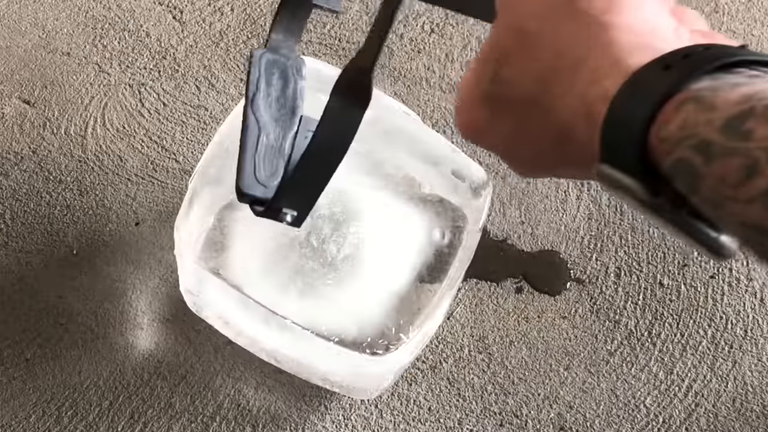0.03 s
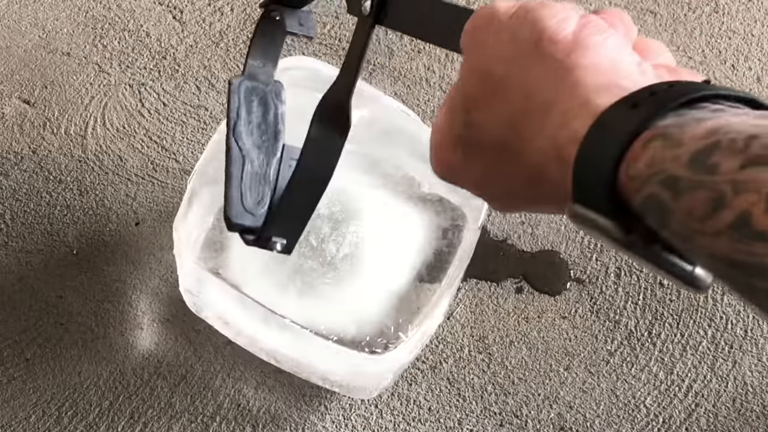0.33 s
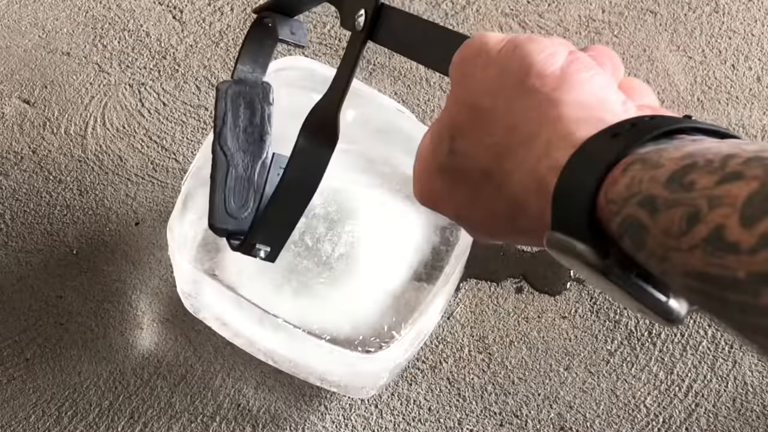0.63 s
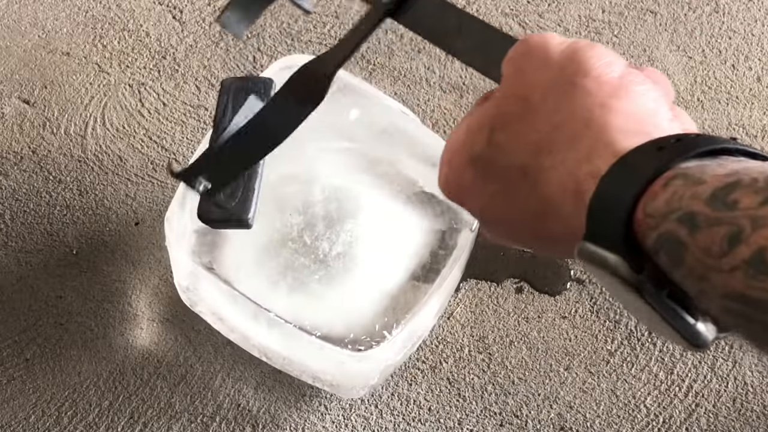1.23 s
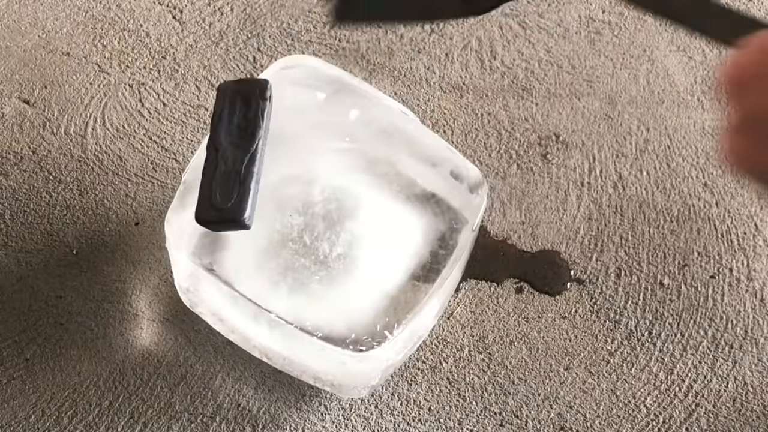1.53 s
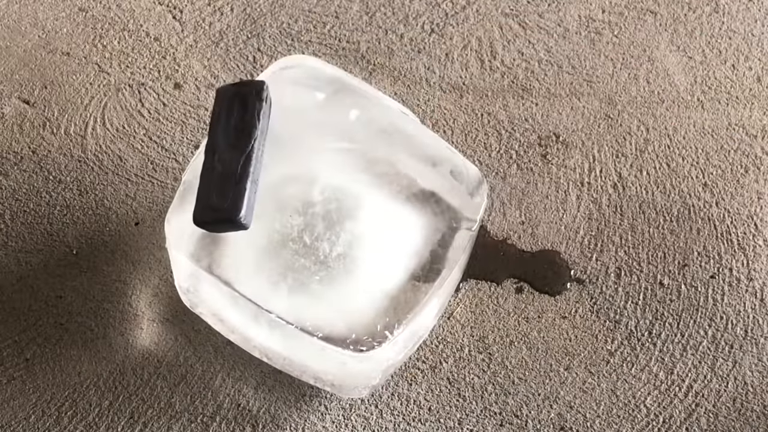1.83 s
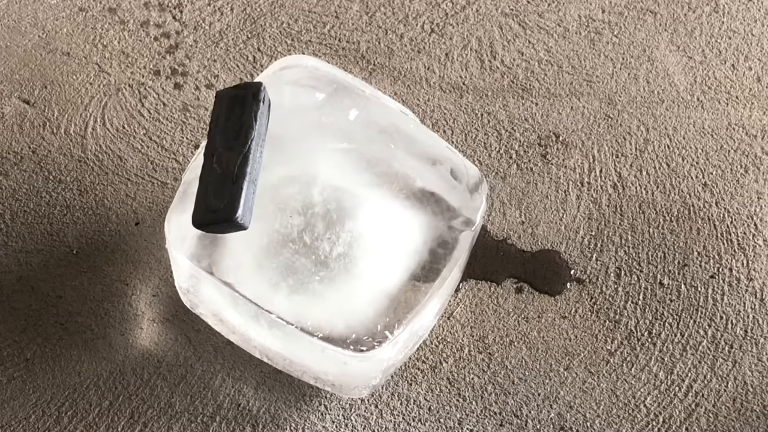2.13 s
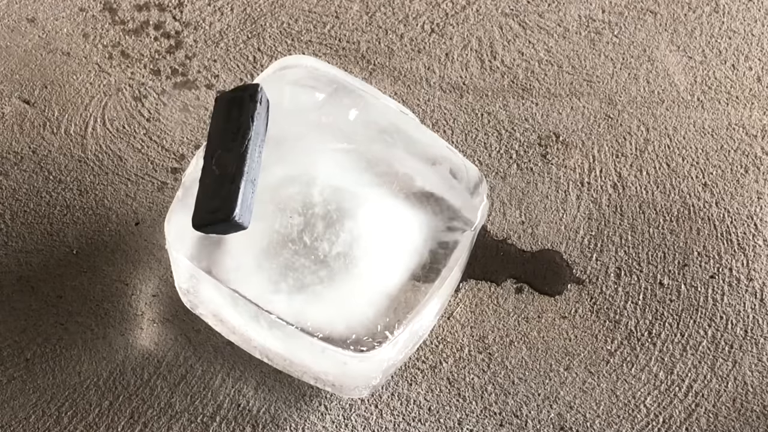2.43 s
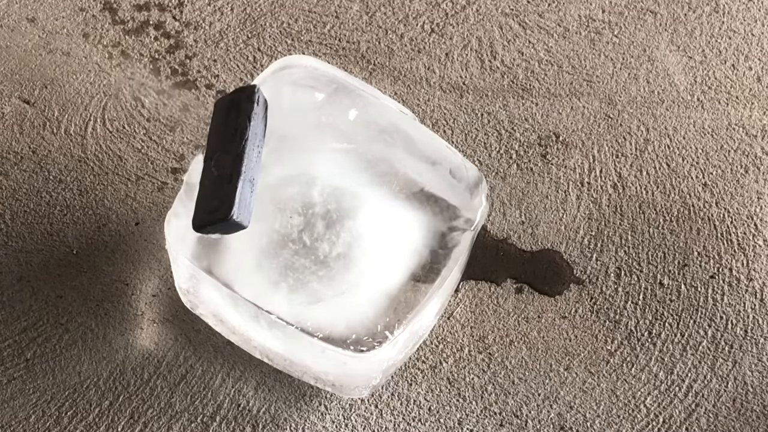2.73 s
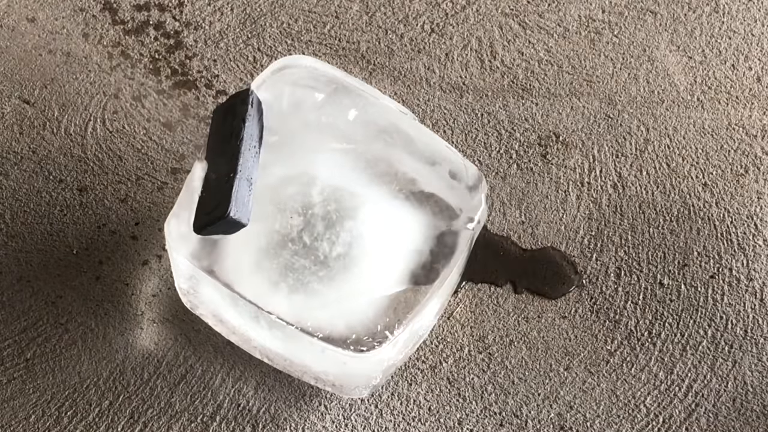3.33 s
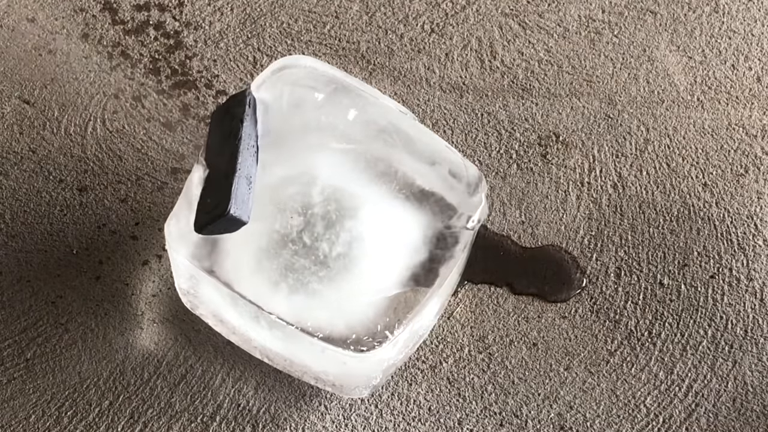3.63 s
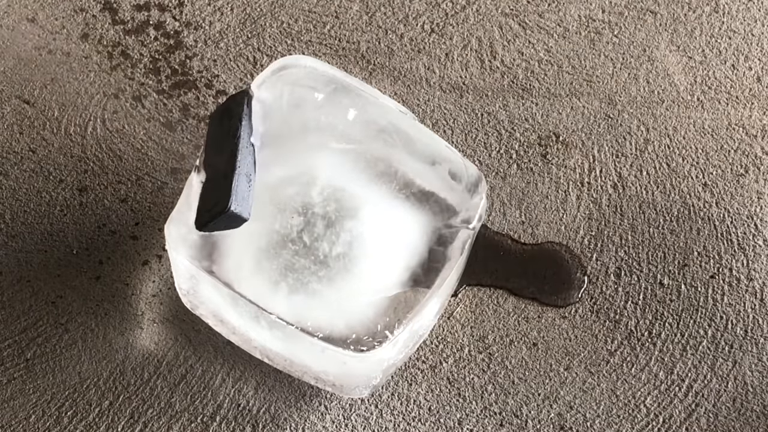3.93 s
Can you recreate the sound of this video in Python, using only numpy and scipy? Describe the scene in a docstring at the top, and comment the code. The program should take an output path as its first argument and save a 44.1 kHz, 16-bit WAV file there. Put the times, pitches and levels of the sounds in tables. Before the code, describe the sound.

Hot metal sizzles on ice, squealing and gurgling, then spitting ever harder.

```python
"""On a concrete floor outdoors, a hot metal bar is laid on a block of ice. It chatters on its own
cushion of steam with a wavering squeal, which breaks into falling chirps and sinks into a boiling
gurgle as meltwater gathers. Steel tongs snap shut with one bright clink. The sizzle grows and spits
ever harder as water flashes to steam. Nearby walls add a short echo over a faint, low rumble."""
import sys
import numpy as np
from scipy import signal
from scipy.fft import rfft, irfft, next_fast_len
from scipy.io import wavfile
from scipy.ndimage import map_coordinates

SR = 44100
rng = np.random.default_rng(int(sys.argv[2]) if len(sys.argv) > 2 else 0)


def generate_wav(signal):
    """Clip the signal to [-1, 1] and save it as 16-bit WAV at the path in sys.argv[1]."""
    frames = np.transpose(np.atleast_2d(signal))
    scaled = np.clip(frames, -1, 1) * 32767
    pcm = np.round(scaled).astype(np.int16)
    wavfile.write(sys.argv[1], SR, pcm)


N = 176400  # 4 seconds


# the bar's squeal, the hum of a steam pocket and a burble (t/s, f/Hz, level/dB)
SQUEAL = [(.865, 930, -49), (.895, 1015, -30), (.94, 990, -40.5), (.996, 1120, -42), (1.04, 994, -37.5),
          (1.09, 1003, -33), (1.18, 796, -37), (1.25, 996, -37.5), (1.37, 997, -40.5), (1.47, 1023, -41),
          (2.83, 1080, -41.5), (3.5, 963, -55)]
POCKET_HUM = [(1.7, 290, -66), (2.05, 255.4, -46.5), (2.25, 220, -46), (2.6, 213, -44.5),
              (2.9, 212.1, -43.5), (3.04, 247.8, -62), (3.18, 274.8, -41.5), (3.68, 280.2, -39),
              (3.85, 348.5, -51)]
BURBLE = [(1.65, 629.5, -37), (3, 533.8, -39), (4, 557, -48)]

def singing():
    """The bar squeals on its steam cushion; lower down, trapped steam hums and burbles."""
    return (wavering(SQUEAL, jitter=0.03206, shimmer_db=3.5, rate=200, octave_db=-18)
            + wavering(POCKET_HUM, jitter=0.02484, shimmer_db=4.5, rate=60, octave_db=-10.5)
            + wavering(BURBLE, jitter=0.0426, shimmer_db=5.5, rate=80, octave_db=-14))


# each chirp at its loudest moment (t/s, f/Hz, level/dB)
CHIRPS = [(1.305, 639, -28.5), (1.399, 640, -27), (1.466, 636, -28), (1.54, 625, -26.5), (1.58, 633, -28),
          (1.715, 633.5, -29), (1.764, 623, -28.5), (1.986, 605.6, -27.5), (2.083, 602, -28),
          (2.25, 591, -28), (2.285, 613, -29), (2.366, 576.5, -27.5), (2.487, 582.6, -30),
          (2.628, 565.4, -30.5)]
# the tones that make up the first chirp (multiple of the pitch, level/dB)
OVERTONES = [(1, -3), (2, -4.5), (3, -16)]

def chirps():
    """Steam lifts the bar with a falling tone and a puff; as it gets wetter, chirps turn into gulps."""
    swoop_hz, swoop_s, dulling_db_per_s, wetting_s = 55, 0.0192, 2.5, 0.7
    tones, puffs = np.zeros(N), np.zeros(N)
    t = np.arange(-SR // 16, SR // 16) / SR  # zero at the chirp's peak
    jitter = 1 + 0.019 * wobble(250)
    swoop = swoop_hz * (np.exp(np.minimum(-t / swoop_s, 1)) - 1)
    first_s = CHIRPS[0][0]
    for s, hz, db in CHIRPS:
        age, start = s - first_s, round(s * SR) - SR // 16
        span = slice(start, start + len(t))
        length = 0.011 + 0.012 * np.exp(-age / 0.26)  # later chirps are shorter
        swell = amp(db) * np.exp(-2 * np.log(2) * (t / length) ** 2)
        phase = phase_of((hz + swoop) * jitter[span])
        for multiple, level in OVERTONES:
            fade_db = dulling_db_per_s * age * (multiple - 1)
            tone = np.sqrt(2) * np.sin(multiple * phase + 2 * np.pi * rng.random())
            tones[span] += swell * amp(level - fade_db) * tone
        puffs[span] += swell
    wetness = np.clip((clock() - first_s) / wetting_s, 0, 1)
    gulp = wetness * amp(-5.5) * noise(BOIL_COLOUR)
    return tones + puffs * (amp(-9.5) * steam() + gulp)


# squeaks of the first touches, then of the squeal breaking up (t/s, level/dB)
SQUEAKS = [(.455, -55.5), (0.599, -57), (1.419, -33), (1.521, -29.5), (1.553, -34), (1.593, -29),
           (1.635, -28), (1.659, -27.5), (1.731, -34.5), (1.798, -31), (1.838, -28), (1.857, -29.5),
           (1.984, -35), (2.128, -34.5)]

def squeaks():
    """Each short touch of the bar gives a rough, falling squeak."""
    length_s, fall_hz_per_s = 0.015, 7300
    out, hz = np.zeros(N), 1022 * (1 + 0.028 * wobble(250))
    for s, db in SQUEAKS:
        t = clock() - s
        swell = amp(db) * np.exp(-2 * (t / length_s) ** 2)
        out += swell * np.sqrt(2) * np.sin(phase_of(hz - fall_hz_per_s * t))
    return out


# how loud the boiling is (t/s, level/dB)
BOIL_LEVEL = [(.85, -68), (.9, -47), (1.25, -43.5), (1.55, -38.5), (1.8, -34), (2.8, -34.5), (3.55, -35),
              (3.8, -32)]
# its colour, meaning how strong the low and high parts are (f/Hz, level/dB)
BOIL_COLOUR = [(100, -52), (220, -6), (400, -6.5), (560, -1), (1000, 3.5), (1230, -1.5), (1550, -8.5),
               (2200, -16.5), (4000, -25.5), (9000, -77)]
# its brightness: added to the highs and taken from the lows (t/s, level/dB)
BOIL_TILT = [(1.3, 8), (2.2, 0.5), (4, -8.5)]

def boiling():
    """Water bubbles under the bar with an uneven beat, deeper as the meltwater gathers."""
    split_hz, beats_per_s, beat_db = 700, 28, 3
    (db,), (tilt_db,) = curves(BOIL_LEVEL), curves(BOIL_TILT)
    bubbling = noise(BOIL_COLOUR)
    lows = filtered(bubbling, lambda hz: 1 / (1 + (hz / split_hz) ** 4))
    low_gain, high_gain = amp(-tilt_db), amp(tilt_db)
    mix = (low_gain * lows + high_gain * (bubbling - lows)) / np.hypot(low_gain, high_gain)
    beat = np.sin(phase_of(beats_per_s * np.exp(0.299 * wobble(beats_per_s))))
    return amp(db) * unit(amp(beat_db * beat) * mix)


# how loud the steam jet, the sizzle and the splutter are (t/s, level/dB)
JET_LEVEL = [(.34, -82), (.43, -60), (.68, -63.5), (.7, -49.5), (.73, -59), (.86, -57), (.89, -50),
             (1.5, -46), (2.1, -44), (4, -54)]
SIZZLE_LEVEL = [(.257, -75), (.263, -62), (.38, -67), (1.1, -66.5), (1.5, -43.5), (2.18, -39.5),
                (2.27, -34), (2.8, -30), (3.08, -32), (3.3, -30.5)]
SPLUTTER_LEVEL = [(1, -77), (3.1, -64), (3.57, -38.5), (3.61, -27), (3.645, -39), (3.77, -28.5),
                  (3.82, -34), (3.95, -35), (3.99, -26.5)]
# colours of the bright sizzle and the coarse splutter (f/Hz, level/dB)
SIZZLE_COLOUR = [(900, -23), (1600, -7.5), (3400, -6.5), (3700, -4), (7300, -3.5), (8600, 1), (15800, 0.5)]
SPLUTTER_COLOUR = [(400, -18), (1000, -16), (1400, -1.5), (3000, -5), (15000, -12)]

def sizzle():
    """A thin steam jet, then a fluttering sizzle, then a splutter as water floods the hot metal."""
    (jet_db,), (sizzle_db,) = curves(JET_LEVEL), curves(SIZZLE_LEVEL)
    (splutter_db,) = curves(SPLUTTER_LEVEL)
    jet = amp(jet_db + 1.45 * wobble(49.55)) * steam()
    flutter_db = 2.5 * wobble(220) + 0.34 * wobble(45)
    frying = amp(sizzle_db + flutter_db) * fizz(SIZZLE_COLOUR, per_s=2500, share=0.64)
    splutter = unit(amp(3.4 * wobble(180)) * fizz(SPLUTTER_COLOUR, per_s=2500, share=0.55))
    return jet + frying + amp(splutter_db) * splutter


# colour of the steam jet (f/Hz, level/dB)
JET_COLOUR = [(1500, -16), (2400, -4), (3400, -5), (6800, -4.5), (7500, -10.5), (8700, -2.5), (10500, -8.5),
              (15500, -6)]
# pitches at which the gap under the bar whistles (f/Hz, width/Hz, level/dB)
WHISTLES = [(4720, 99, 5.5), (5550, 200, 4.5), (6600, 310, 2.5), (14250, 460, -11)]

def steam():
    """Steam whistles out of the thin gap under the bar."""
    def gap(f):
        peaks = sum(amp(db) ** 2 / (1 + (2 * (f - hz) / width) ** 2) for hz, width, db in WHISTLES)
        return np.sqrt(1 + peaks)
    return unit(filtered(fizz(JET_COLOUR, per_s=3600, share=0.54), gap))


# spits of meltwater, timed at their middles (t/s, level/dB, length/s)
SPITS = [(2.819, -29, .0036), (2.846, -31, 0.0064), (2.955, -29, .007), (3.031, -26.5, .02),
         (3.092, -26.5, .011), (3.13, -25.5, 0.016), (3.162, -26.5, .004), (3.191, -25.5, .016),
         (3.218, -23.5, .01), (3.246, -26, 0.018), (3.321, -24.5, 0.0076), (3.38, -23.5, .007),
         (3.409, -23, .007), (3.435, -25.5, 0.015), (3.466, -21.5, 0.0034), (3.501, -26, .007),
         (3.55, -25, 0.0075), (3.575, -22, .007), (3.607, -23.5, .035), (3.657, -22, 0.0088),
         (3.689, -24, .006), (3.712, -24, .012), (3.771, -28, .022)]
# their colour (f/Hz, level/dB)
SPIT_COLOUR = [(400, -32), (1200, -5), (3000, 1.5), (9500, 5), (15800, -1)]

def spits():
    """Water touches the metal and flashes to steam in sudden crackling bursts."""
    bursts = sum(amp(db) * burst(s, length) for s, db, length in SPITS)
    return bursts * unit(amp(1.8 * wobble(500)) * fizz(SPIT_COLOUR, per_s=5000, share=0.38))


# wet squirts, timed at their middles (t/s, level/dB, length/s, f/Hz)
SQUIRTS = [(3.604, -28.5, .036, 2300), (3.712, -31, .014, 1800), (3.773, -31.5, .028, 2504),
           (3.991, -30.5, .022, 1650)]

def squirts():
    """Steam opens a hollow in the water, which rings lower as it grows."""
    width_hz, fall_octaves_per_s = 770, 30
    out = np.zeros(N)
    flow = unit(wobble(width_hz)) + 1j * unit(wobble(width_hz))  # smears a tone into a band of noise
    for s, db, length, hz in SQUIRTS:
        pitch = hz * 2 ** (-fall_octaves_per_s * np.clip(clock() - s, -length, length))
        out += amp(db) * burst(s, length) * np.real(flow * np.exp(1j * phase_of(pitch)))
    return out


# big bubbles collapsing (t/s, level/dB)
PLOPS = [(3.783, -25), (3.838, -22), (3.864, -23.5), (3.901, -24.5), (3.944, -24)]

def plops():
    """Each big bubble collapses with a low plop and a slosh of water."""
    hz = 363
    out, t = np.zeros(N + SR), np.arange(SR // 10) / SR
    water = noise(BOIL_COLOUR)
    tone = 2 * np.sin(2 * np.pi * hz * t)
    shape = (1 - np.exp(-hz * t)) * fade(t, 0.037)
    for s, db in PLOPS:
        start = round(s * SR)
        slosh = np.roll(water, -start)[:len(t)]
        out[start:][:len(t)] += amp(db) * shape * (tone + slosh)
    return out[:N]


# ringing tones of the jaws as they hit (f/Hz, level/dB, time to fade by 60 dB/s)
CRACK_TONES = [(5580, 0.5, 0.012), (7300, -2.5, 0.016), (8790, -4, 0.028), (11190, -0.5, 0.02),
               (13580, 6, 0.017)]

def tongs_crack():
    """The jaws of the tongs meet with one hard, bright crack, with a rough echo off the floor and walls."""
    start_s, attack_s = 1.6628, 0.0011
    out, t = np.zeros(N), np.arange(SR // 10) / SR
    ring = sum(amp(db) * fade(t, fade_s) * np.sin(2 * np.pi * (hz * t + rng.random()))
               for hz, db, fade_s in CRACK_TONES)
    hiss = noise([(800, -11), (3000, -9.5), (6000, -4), (9000, 2.5), (15000, -5)])[:len(t)]
    snap, tail = amp(0.5) * fade(t, 0.011), amp(-18) * fade(t, 0.24)
    attack = 1 - np.exp(-t / attack_s)
    out[round(start_s * SR):][:len(t)] = amp(-7) * attack * (ring + (snap + tail) * hiss)
    return out


# the tongs touch down, then shut (t/s, level/dB)
CLINKS = [(.262, -72), (1.662, -34)]
# ringing tones of the steel (f/Hz, level/dB, time to fade by 60 dB/s)
TONG_TONES = [(5440, -1, 0.22), (8750, -4, .16), (9960, -14, 0.36), (11170, 5, 0.18), (13300, -1, .2),
              (13700, -1, .22)]

def tongs_ring():
    """The steel tongs ring on after each clink, their tones slightly blurred."""
    out, t = np.zeros(N), np.arange(SR // 2) / SR
    ring = np.zeros(len(t))
    for hz, db, fade_s in TONG_TONES:
        pitch = hz * (1 + 0.008 * wobble(390)[:len(t)])
        ring += amp(db) * fade(t, fade_s) * np.sin(phase_of(pitch))
    for s, db in CLINKS:
        out[round(s * SR):][:len(t)] += amp(db) * ring
    return out


# colour of the bar brushing the ice (f/Hz, level/dB)
GRAZE_COLOUR = [(3000, -19), (6700, 1), (7450, -11), (7900, -2), (13000, -13)]

def graze():
    """A corner of the bar grazes the ice with a thin hiss."""
    return amp(-50.5) * burst(s=0.573, length=0.043) * noise(GRAZE_COLOUR)


def walls(x):
    """Nearby walls scatter the sound back as a short echo."""
    delay_s = 0.017
    t = np.arange(SR // 2) / SR
    tail = rng.standard_normal(len(t)) * fade(t, 0.2) * (t > delay_s)
    return amp(-10.5) * signal.fftconvolve(x, tail / np.linalg.norm(tail))[:N]


# colour of the outdoor rumble (f/Hz, level/dB)
AIR_COLOUR = [(48, -9.5), (140, -2.5), (240, -5.5), (550, -19), (2500, -51.5)]

def air():
    """A faint, steady outdoor rumble."""
    return amp(-56) * noise(AIR_COLOUR)


def amp(db):
    """Turns decibels into a number to multiply by."""
    return 10 ** (np.asarray(db) / 20)


def fade(t, fade_s):
    """Dies away by 60 dB every fade_s seconds."""
    return amp(-60 * t / fade_s)


def unit(x):
    """Scales x to an average power of 1."""
    return x / np.sqrt(np.mean(x ** 2) + 1e-20)


def clock():
    """The time of each sample, in seconds."""
    return np.arange(N) / SR


def curves(rows):
    """Joins a table's points with lines: one curve for each column after the time."""
    s, *columns = np.transpose(rows)
    return [np.interp(clock(), s, column) for column in columns]


def wobble(rate):
    """A smooth curve through `rate` random points a second."""
    return map_coordinates(rng.standard_normal(N // 4), [clock() * rate + 2], mode="wrap")


def burst(s, length):
    """Switches quickly on and off again, centred on time s."""
    return 1 / (1 + (2 * (clock() - s) / length) ** 8)


def phase_of(hz):
    """The angle a wave has turned through as it follows a pitch curve."""
    return 2 * np.pi * np.cumsum(hz) / SR


def wavering(rows, jitter, shimmer_db, rate, octave_db):
    """A tone and its octave, shaky in pitch (jitter) and in level (shimmer)."""
    hz, db = curves(rows)
    phase = phase_of(hz * (1 + jitter * wobble(rate)))
    tone = np.sin(phase) + amp(octave_db) * np.sin(2 * phase)
    fade_in = np.clip((clock() - rows[0][0]) * hz / 10, 0, 1)  # over ten cycles
    return fade_in * amp(db) * unit(amp(shimmer_db * wobble(rate)) * tone)


def filtered(x, response):
    """Turns each frequency in x up or down by response(hz)."""
    size = next_fast_len(N + SR // 2)
    return irfft(rfft(x, size) * response(np.fft.rfftfreq(size, 1 / SR)), size)[:N]


def coloured(x, colour):
    """Shapes x with a colour table (f/Hz, level/dB), at an average power of 1."""
    f, db = np.transpose(colour)
    def response(hz):
        bass_cut = hz ** 2 / (hz ** 2 + (f[0] / 2) ** 2 + 1)
        return amp(np.interp(np.log(hz + 1), np.log(f + 1), db)) * bass_cut
    return unit(filtered(x, response))


def noise(colour):
    """Smooth noise of the given colour."""
    return coloured(rng.standard_normal(N), colour)


def fizz(colour, per_s, share):
    """Tiny bubbles burst over smooth steam noise; share is their part of the power."""
    pops = unit((rng.random(N) < per_s / SR) * rng.standard_normal(N))
    return coloured(np.sqrt(share) * pops + np.sqrt(1 - share) * rng.standard_normal(N), colour)


def scene():
    """The bar on the ice with its echo, the tongs' crack with its own rough echo off floor and walls, and the
    rumble, in mono."""
    bar = singing() + chirps() + squeaks() + boiling() + sizzle()
    bar += spits() + squirts() + plops() + graze()
    return (bar + walls(bar) + tongs_crack() + tongs_ring() + air())[None]


def record(dry):
    """Rounds off the loudest peaks and cuts the very highest treble."""
    ceiling, top_hz = 0.82, 15850
    rounded = dry[0] / (1 + (dry[0] / ceiling) ** 4) ** (1 / 4)
    return filtered(rounded, lambda hz: hz < top_hz)[None]


dry = scene()
out = record(dry)
generate_wav(out)
```